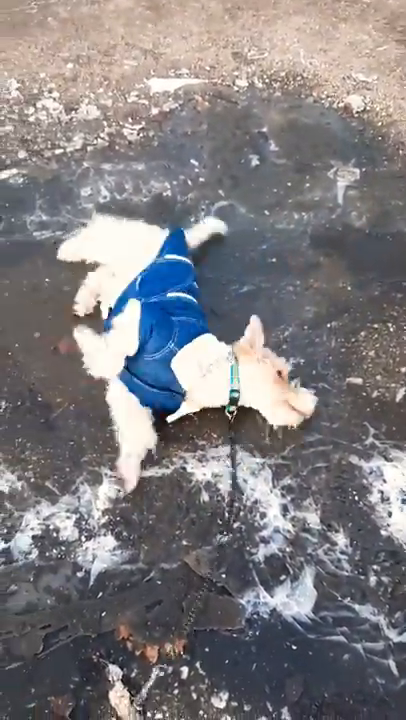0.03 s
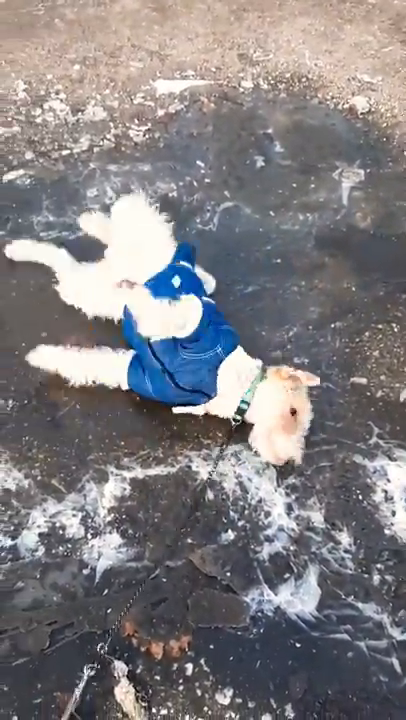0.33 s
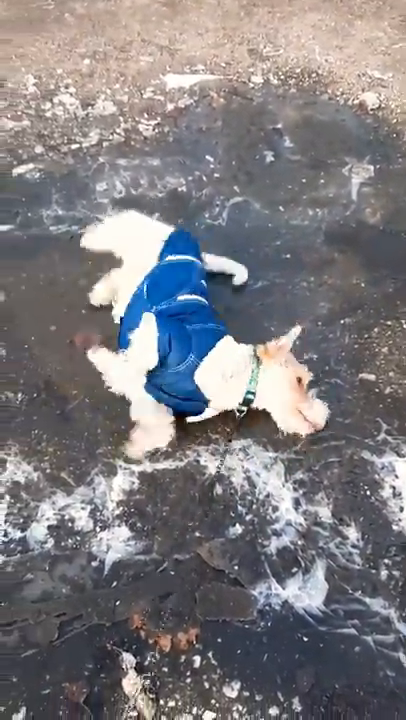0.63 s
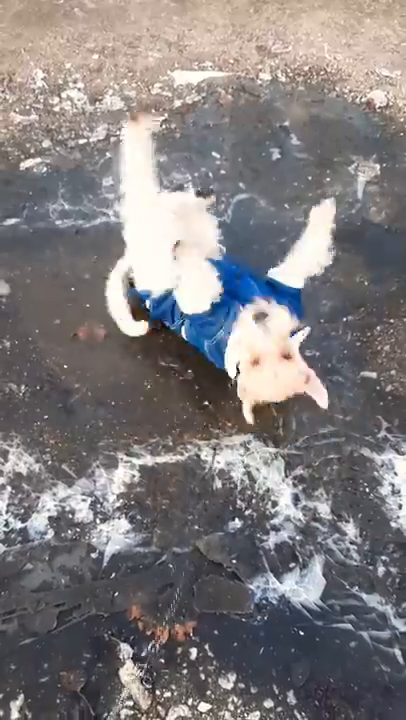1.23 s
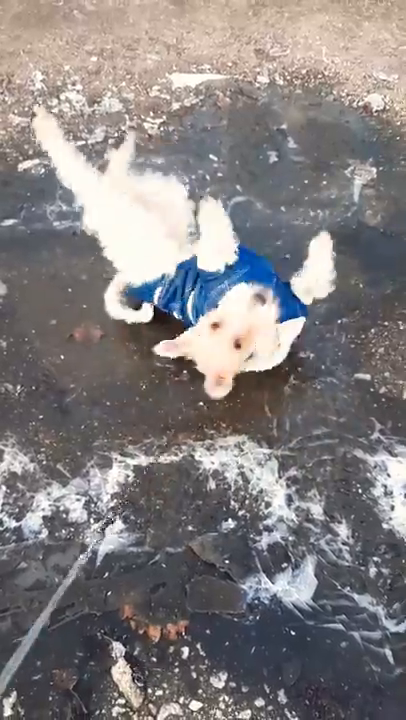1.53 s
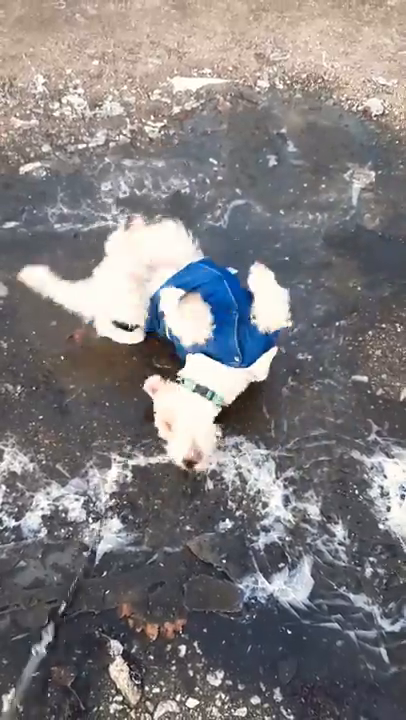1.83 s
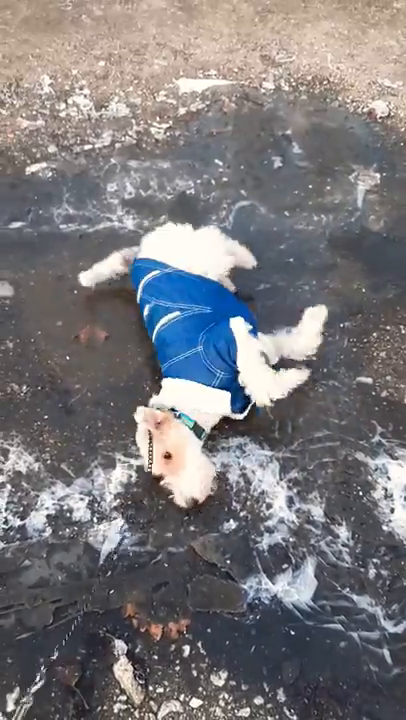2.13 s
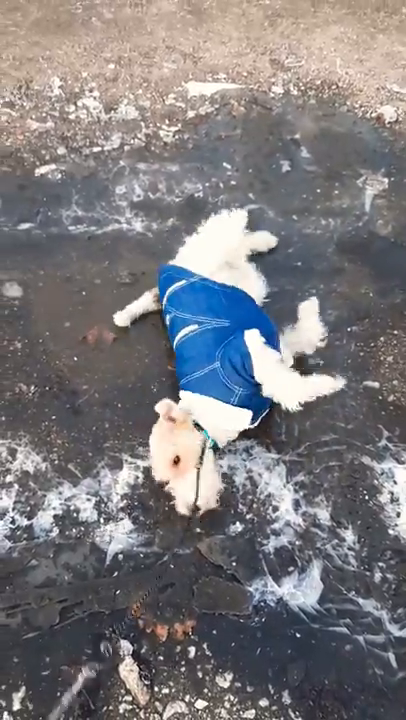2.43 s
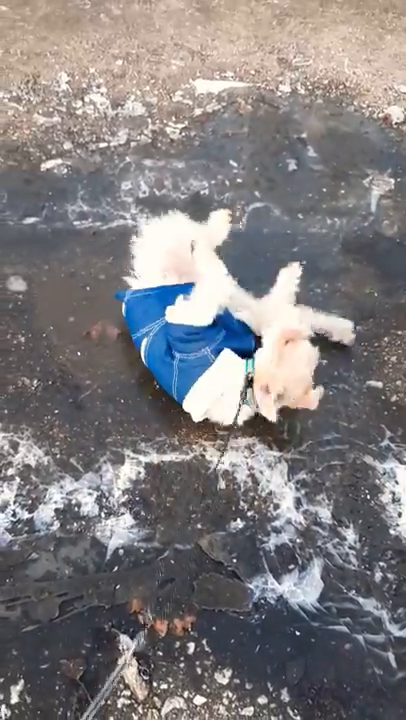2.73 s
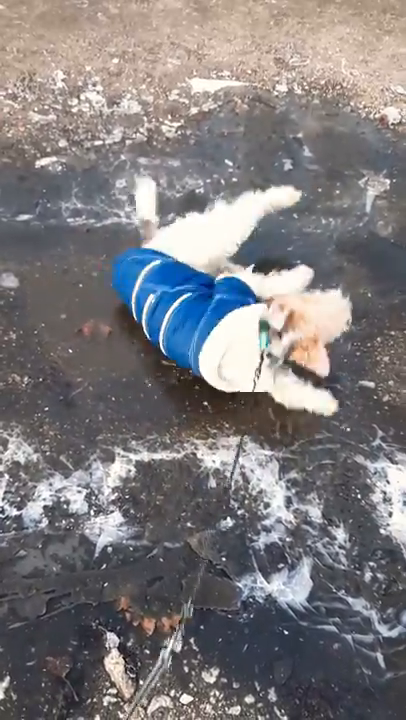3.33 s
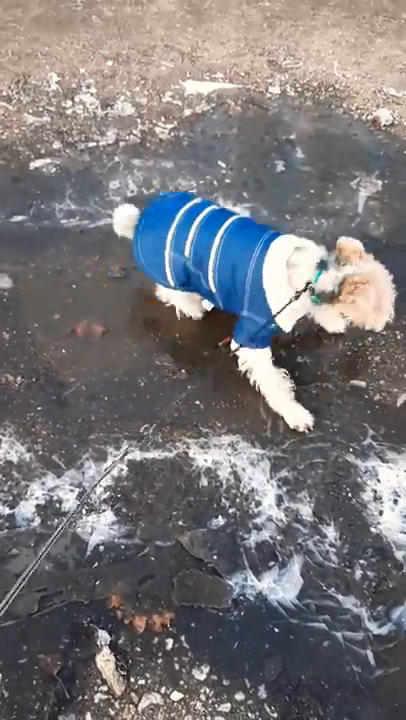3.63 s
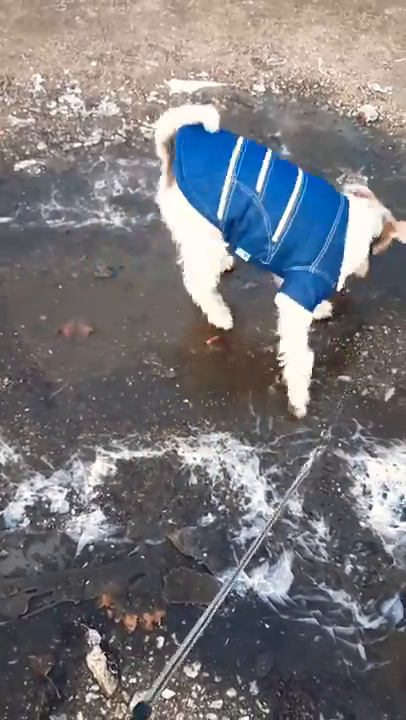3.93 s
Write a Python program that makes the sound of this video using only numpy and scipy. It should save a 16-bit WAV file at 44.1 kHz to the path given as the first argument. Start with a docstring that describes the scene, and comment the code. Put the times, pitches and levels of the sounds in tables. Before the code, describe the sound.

A dog rolls on gritty ice with short scrapes, crunches and sharp leash clicks.

```python
"""Small dog rolling on gritty ice

A dog in a coat rolls about and scrambles up again. Sliding friction makes the cloth hiss
and a paw scrape; grit fractures under the body, which lands with dull bumps. Close by,
tugs on the leash excite ticks and the damped modes of its plastic and its metal clip.
Behind it all lies a faint outdoor rumble with a low hum."""
import sys
import numpy as np
from scipy import signal
from scipy.fft import rfft, irfft
from scipy.io import wavfile

SR = 44100
rng = np.random.default_rng(int(sys.argv[2]) if len(sys.argv) > 2 else 0)


def to_wav(s):
    """Save 16-bit WAV."""
    ch = np.atleast_2d(s).T  # columns
    pcm = np.round(np.clip(ch, -1, 1) * 32767)  # PCM
    wavfile.write(sys.argv[1], SR, pcm.astype(np.int16))


N = 176400
TIME, FREQS = np.arange(N) / SR, np.maximum(np.arange(N // 2 + 1) * SR / N, 1)
TREBLE_HZ = 9000


# strokes of the coat: (time [s], half width [s], level [dB], treble gain [dB])
COAT_STROKES = [(.01, 0.026, -56.5, -7), (0.129, 0.046, -60.5, 0), (0.302, 0.054, -57, 0),
                (0.389, 0.046, -58, -1.5), (0.513, 0.066, -62, -2), (0.696, 0.052, -64, 0.5),
                (0.81, 0.036, -54.5, 2), (0.887, 0.051, -66, 5), (1.03, 0.12, -72.5, 5.5),
                (1.783, 0.093, -70, 1), (2.008, .05, -53.5, 1.5), (2.134, .06, -65.5, 3.5),
                (2.563, 0.012, -66.5, -12), (2.643, 0.093, -67, 0.5), (3.146, 0.041, -63.5, -24),
                (3.344, 0.089, -65, -3), (3.386, 0.0055, -54.5, -5)]
# hiss of the sliding coat, with the microphone's notch near 9 kHz:
# (frequency [Hz], relative level [dB])
COAT_HISS = [(700, -3), (1500, 8), (2800, 5), (4000, -2), (5200, -2.5), (7200, -2.5), (8000, -13),
             (8800, -40.5), (11000, -9), (15500, -7.5)]

def coat():
    """Sliding friction: cloth on ice gives a slightly grainy hiss, brighter in some strokes."""
    hiss = colour(white() + 0.16 * grains(), spectrum(COAT_HISS), alike=0.073)
    treble = irfft(rfft(hiss) * (FREQS > TREBLE_HZ), N)
    low_swell = swells([(s, half, db) for s, half, db, _ in COAT_STROKES])
    high_swell = swells([(s, half, db + treble_db) for s, half, db, treble_db in COAT_STROKES])
    return ((hiss - treble) * low_swell + treble * high_swell) * pan(db=-2)


# crunches: (time [s], half width [s], level [dB])
GRIT_CRUNCHES = [(1.912, .012, -48), (1.943, 0.015, -46.5), (1.9695, .002, -40), (2.025, 0.055, -55.5),
                 (2.245, 0.023, -63), (2.38, 0.39, -64.5), (2.56, 0.01, -67), (2.692, 0.0077, -51),
                 (3.03, 0.021, -67), (3.127, .002, -51), (3.366, 0.0043, -51.5)]
# sound of the grit: (frequency [Hz], relative level [dB])
GRIT_SPECTRUM = [(300, 6), (600, -1), (1100, 0.5), (2200, 0), (3200, -6), (4500, -22.5), (7000, -25.5),
                 (9000, -35)]

def grit():
    """Brittle fracture: dense impulses merge into a dull crunch under the dog's weight."""
    crunch = colour(grains(), spectrum(GRIT_SPECTRUM), alike=0.36)
    return crunch * swells(GRIT_CRUNCHES) * pan(db=-8)


# scrapes as the dog gets up: (time [s], half width [s], level [dB])
PAW_SCRAPES = [(3.33, 0.015, -51.5), (3.356, 0.012, -52)]
# contact resonances: (frequency [Hz], gain [dB], T60 [s])
PAW_MODES = [(820, 3.5, 0.013), (1740, 1, 0.013), (2070, -4.5, 0.048), (2760, 2, 0.0044),
             (4510, -2, 0.0039), (5540, 2.5, 0.0022), (6660, 0, 0.0041)]

def paw(slip_hz=140, slip_depth=0.54):
    """Stick-slip friction: a paw's rubbing pulses unevenly and drives a few resonances."""
    wander = colour(white(), FREQS < slip_hz / 2, alike=0.88)[0]
    slip_phase = 2 * np.pi * np.cumsum(slip_hz * (1 + 0.24 * wander)) / SR
    slips = 1 + slip_depth * np.cos(slip_phase)
    rubbing = colour(white() + 0.5 * grains(), FREQS < TREBLE_HZ, alike=0.62)
    return unit_rms(ring(rubbing * slips, PAW_MODES)) * swells(PAW_SCRAPES) * pan(db=-5)


# squeaks on the ice: (time [s], half width [s], level [dB], frequency [Hz])
ICE_SQUEAKS = [(2.245, 0.0087, -63, 2300), (2.56, .009, -64, 3490), (3.03, 0.0052, -65.5, 2840)]

def squeaks():
    """Friction-induced vibration: brief rough tones sound where the rubbing catches."""
    return sum(narrowband(hz, half_width_hz=100, alike=0.49) * swells([(s, half, db)])
               for s, half, db, hz in ICE_SQUEAKS) * pan(db=-9)


# landings of body and paws: (time [s], half width [s], level [dB])
BODY_BUMPS = [(.31, .04, -62), (.89, 0.056, -52), (2.08, .03, -51.5), (2.4, 0.042, -51), (2.7, .03, -53),
              (3.365, .02, -44.5), (3.56, 0.16, -52), (3.76, 0.14, -51.5)]
# sound of the bumps: (frequency [Hz], relative level [dB])
BODY_SPECTRUM = [(70, -1), (120, 6), (200, -0.5), (380, -3.5), (600, -18), (1200, -50), (4000, -62)]

def body():
    """Soft impact: the dog's weight lands slowly, so the energy lies at low frequencies."""
    thud = colour(white(), spectrum(BODY_SPECTRUM), alike=0.83)
    return thud * swells(BODY_BUMPS) * pan(db=-5)


# ticks of leash and grit, with relative band levels:
# (time [s], decay [ms], middle [dB], edge [dB], sizzle [dB], pan [dB])
SHARP_TICKS = [(0.0753, 0.53, -26, -26.5, -37, -4), (0.0804, 1, -61, -44, -33.5, 19),
               (0.0786, 0.75, -35, -31, -39, 15), (.0860, .7, -40, -42, -33, -13),
               (0.0897, .6, -44, -53, -49, -2), (0.092, 2.1, -44, -54, -51, -7),
               (0.0958, .9, -35, -46, -46, -14), (0.0997, 0.63, -48, -39, -51, 7),
               (0.104, .7, -54, -46, -44, 6), (0.1192, 1.3, -47, -60, -51, -6),
               (.1230, 1.5, -38.5, -60, -60, -4), (.4020, 1.1, -43, -43, -49, -7),
               (0.4153, 1.5, -57, -44, -47, 6), (.4944, 1.4, -65, -48, -49.5, -2),
               (0.763, 1.1, -43, -46, -44, -6), (.7858, 2.3, -56, -47, -40, 3),
               (0.7951, 0.5, -54, -43, -35, -6), (0.7998, 1.5, -46, -36, -35, -15),
               (0.803, 1.1, -43, -41, -47, 1), (0.8148, 0.91, -50, -32.5, -32, -3),
               (.8175, .8, -56, -42, -48, -1), (.8290, 4.2, -47, -43, -44, -21),
               (0.8355, 1.1, -30, -27.5, -42, 7), (.9640, 1.4, -53, -50, -56, 12),
               (1.0028, .8, -70, -66, -49.5, -10), (1.651, .8, -82, -61, -51.5, -11.5),
               (1.7690, 3.6, -50, -47, -50.5, -8), (1.9005, 0.51, -20.5, -24.5, -46, -10.5),
               (1.903, 1.5, -45, -33.5, -43, -1), (1.9104, 1.1, -43, -36, -43, -9),
               (1.9205, .7, -55, -40, -62, 4), (1.9363, 1.7, -40, -48, -49, 5),
               (1.9684, 0.58, -35.5, -38.5, -46, -4), (1.9718, 1, -47, -48, -51, 10),
               (1.9848, 0.86, -54, -39.5, -45, -11), (1.993, 1.0, -47, -47, -58, -4),
               (2.0120, .8, -54, -44, -62, 2), (2.0180, 0.62, -56, -41, -60, -8),
               (2.0234, 1.2, -37.5, -51, -41, -11), (2.0490, 1.1, -44, -45, -54, -4),
               (2.0602, 1.2, -51, -48, -35, 17), (2.071, 1.5, -60, -48, -44, 6),
               (2.0749, 1.1, -57, -45, -35.5, -7), (2.0986, 1.1, -58, -51, -42.5, -2),
               (2.1750, .7, -50, -64, -52, -18), (2.689, 1.6, -63, -47, -53, 3),
               (2.6957, 1.9, -45.5, -69, -68, 7), (3.1258, 1.1, -47, -61, -72, -4)]
THUD_HZ, MIDDLE_HZ, EDGE_HZ, SIZZLE_HZ = (463, 1380), (1610, 3250), (4200, 7250), (10530, 15900)

def ticks(gain_db=-5.5, ear_spread=0.22):
    """Impulsive excitation: a snap crumbles away in milliseconds, spreading over four bands."""
    out, t = np.zeros((2, N)), TIME[:1024]
    bands = [signal.butter(order, edges, "band", fs=SR, output="sos")
             for order, edges in ((2, THUD_HZ), (2, MIDDLE_HZ), (4, EDGE_HZ), (3, SIZZLE_HZ))]
    for s, decay_ms, middle_db, edge_db, sizzle_db, pan_db in SHARP_TICKS:
        noise = rng.standard_normal((3, len(t)))
        fade = np.exp(-t * 1000 / decay_ms)
        burst = (noise[0] + ear_spread * noise[1:]) * fade
        burst[:, 0] += 7.5   # the first snap
        for sos, db in zip(bands, (middle_db - 7, middle_db, edge_db, sizzle_db)):
            band = unit_rms(signal.sosfilt(sos, burst)) * np.sqrt(2 * np.mean(fade ** 2))
            add(out, s, band * from_db(db + gain_db) * pan(pan_db))
    return out


# knocks of hollow plastic: (time [s], level [dB], pitch ratio [1])
PLASTIC_KNOCKS = [(0.1187, -35.5, 0.98), (0.122, -37, 0.84), (0.7631, -41, 0.87), (0.8255, -40, 0.94),
                  (.8357, -20, 0.98)]
# modes of the plastic: (frequency [Hz], gain [dB], T60 [s])
PLASTIC_MODES = [(2110, 2.5, 0.0074), (2355, 4, 0.014), (2840, -12, 0.017), (7220, -4, 0.0044)]
# chinks of the metal clip: (time [s], level [dB], pitch ratio [1], pan [dB])
CLIP_CHINKS = [(0.074, -28, 0.98, -4), (1.9007, -29, 1, -3), (1.9043, -35, 0.93, -11), (1.9108, -38, 1, -8),
               (2.0527, -33, 1.0, -8), (2.0562, -35, 0.91, -12), (2.0568, -32, 0.96, -9),
               (2.0611, -30, 1.0, -7)]
CLIP_MODES = [(15380, -3, .009), (14900, -2, .006), (13440, -1.5, .005)]

def leash():
    """Free vibration: struck as the leash is tugged, plastic and clip ring in their own modes."""
    knocks, chinks, blow = np.zeros(N), np.zeros((2, N)), signal.unit_impulse(2048)
    for s, db, ratio in PLASTIC_KNOCKS:
        add(knocks, s, from_db(db) * ring(blow, PLASTIC_MODES, ratio))
    for s, db, ratio, pan_db in CLIP_CHINKS:
        add(chinks, s, from_db(db) * ring(blow, CLIP_MODES, ratio) * pan(pan_db))
    return knocks * pan(db=-8) + chinks


def nearer_right(x, lag_s=33e-6):
    """Interaural delay: sound from the right reaches the left ear slightly later."""
    left = irfft(rfft(x[0]) * np.exp(-2j * np.pi * FREQS * lag_s), N)
    return np.array([left, x[1]])


def scatter(x, gain_db=-15, t60_s=0.092):
    """Diffuse reflection: ground and surroundings return a brief tail, different at each ear."""
    t = TIME[:SR // 4]
    tail = rng.standard_normal((2, len(t))) * from_db(-60 * t / t60_s)
    tail = unit_rms(tail) / np.sqrt(len(t))   # unit energy
    return from_db(gain_db) * signal.fftconvolve(x, tail, axes=1)[:, :N]


# envelope of the hum: (time [s], level [dB])
HUM_ENVELOPE = [(0, -48.5), (.6, -53), (1.15, -50), (1.55, -62), (2.3, -52.5), (2.8, -58), (3.05, -42.5),
                (3.35, -58.5), (3.78, -40), (4.0, -48.5)]

def hum(pitch_hz=61.1, wander_hz=3.96):
    """Random modulation: a low tone wavers in frequency and amplitude."""
    wander, wobble = colour(white(), FREQS < 7, alike=0)
    phase = 2 * np.pi * np.cumsum(pitch_hz + wander_hz * wander) / SR
    tone = np.sin(phase) * (1 + 0.26 * wobble)
    return from_db(np.interp(TIME, *np.transpose(HUM_ENVELOPE))) * unit_rms(tone)


# rumble before band limiting: (frequency [Hz], relative level [dB])
RUMBLE_SPECTRUM = [(22, -33), (41, -6), (62, -8), (97, -7), (191, -13.5), (260, -17.5), (330, -17),
                   (602, -24), (900, -24), (1240, -27.5), (1530, -31), (3500, -45)]
# likeness of the rumble at the two ears: (frequency [Hz], correlation [1])
RUMBLE_CORRELATION = [(40, 1), (130, 0.94), (260, 1), (500, 0.56), (1000, 0.21), (2000, 0.12),
                      (3500, 0.083)]
# faint steady tones: (frequency [Hz], half width [Hz], level [dB])
DRONE_BANDS = [(297.8, 4.4, -64), (1542, 130, -66), (2036, 46, -74)]
# balance of the far sounds: (frequency [Hz], pan [dB])
FAR_PAN = [(60, -2.5), (110, -2.5), (380, -5), (700, -3), (1300, -5), (2400, -12.5)]
# thin hiss: (frequency [Hz], relative level [dB])
HISS_SPECTRUM = [(2500, 4.5), (4000, -1.5), (7000, -0.5), (8000, -17), (9000, -17), (11000, -5),
                 (14000, 1.5), (15800, 0.5)]

def outdoors(rumble_db=-47.5, hiss_db=-74):
    """Superposition: far rumble, hum and drones, stronger on the right, add to a diffuse hiss."""
    rolloff = 1 + (FREQS / 3290) ** 8 + (30.4 / FREQS) ** 4
    shape = from_db(over_hz(RUMBLE_SPECTRUM)) / rolloff
    far = from_db(rumble_db) * colour(white(), shape, over_hz(RUMBLE_CORRELATION)) + hum()
    far += sum(from_db(db) * narrowband(hz, half, alike=0.4) for hz, half, db in DRONE_BANDS)
    sides = from_db(over_hz(FAR_PAN) * [[.5], [-.5]])
    sides /= np.sqrt(np.mean(sides ** 2, axis=0))
    hiss = colour(white(), from_db(over_hz(HISS_SPECTRUM)), alike=0.035)
    return irfft(rfft(far) * sides, N) + from_db(hiss_db) * hiss


def from_db(db):
    """Decibels to amplitude ratio."""
    return 10 ** (np.asarray(db) / 20)


def unit_rms(x):
    """Normalisation to unit power."""
    return x / np.sqrt(np.mean(x ** 2) + 1e-20)


def pan(db):
    """Interaural level difference, left minus right, at unit mean power."""
    return unit_rms(from_db([[db / 2], [-db / 2]]))


def over_hz(points):
    """Interpolation on a log-frequency axis."""
    hz, value = np.transpose(points)
    return np.interp(np.log(FREQS), np.log(hz), value)


def spectrum(points):
    """Spectral envelope, cut off an octave below its first point."""
    return from_db(over_hz(points)) * (FREQS > points[0][0] / 2)


def white():
    """Two uncorrelated white noises."""
    return rng.standard_normal((2, N))


def grains(per_s=3800, spread_db=4.5):
    """Shot noise: two streams of tiny fractures of uneven size."""
    sizes = from_db(spread_db * np.minimum(rng.exponential(1, (2, N)), 4)) * np.sign(white())
    return unit_rms(sizes * (rng.random((2, N)) < per_s / SR))


def colour(pair, gain, alike):
    """Mid-side filtering: two noises take a spectrum and the correlation `alike`, at unit rms."""
    mid, side = rfft(pair) * gain
    alike = np.clip(alike, -1, 1)
    return unit_rms(irfft(np.sqrt(1 + alike) * mid + np.sqrt(1 - alike) * side * [[1], [-1]], N))


def narrowband(hz, half_width_hz, alike):
    """Narrow-band noise, heard as a wavering tone."""
    return colour(white(), 1 / (1 + ((FREQS - hz) / half_width_hz) ** 2), alike)


def ring(x, modes, ratio=1):
    """Modal response: damped resonators driven by x, neighbours in opposite sign."""
    out = 0
    for k, (hz, db, t60) in enumerate(modes):
        radius, angle = from_db(-60 / (t60 * SR)), 2 * np.pi * hz * ratio / SR
        feedback = [1, -2 * radius * np.cos(angle), radius ** 2]
        mode = signal.lfilter([0, np.sin(angle)], feedback, x + 1e-18)
        out = out + (-1) ** k * from_db(db) * mode
    return out


def swells(rows):
    """Gaussian envelopes summed in power; a half width is one standard deviation."""
    bells = (from_db(db) * np.exp(-.5 * ((TIME - s) / half) ** 2) for s, half, db in rows)
    return np.sqrt(sum(bell ** 2 for bell in bells))


def add(out, s, sound):
    """Mix a short sound in at s seconds."""
    i = int(s * SR)
    out[..., i:i + sound.shape[-1]] += sound[..., :N - i]


def scene():
    """Superposition of the dog, its leash and the background."""
    sharp = nearer_right(ticks() + leash())
    return sharp + scatter(sharp) + coat() + grit() + paw() + outdoors() + body() + squeaks()


def record(dry):
    """Band limiting: an elliptic low-pass cuts the highest treble steeply."""
    return signal.sosfilt(signal.ellip(10, .2, 80, 15850, fs=SR, output="sos"), dry)


dry = scene()
out = record(dry)
to_wav(out)
```